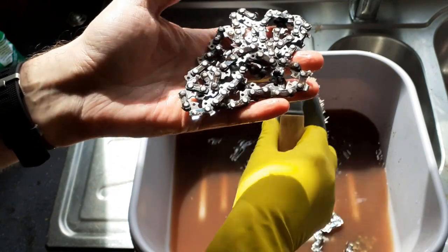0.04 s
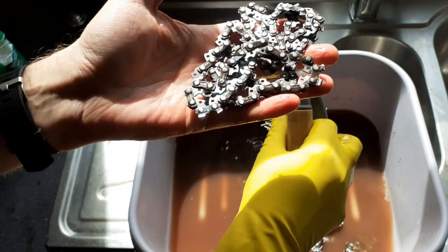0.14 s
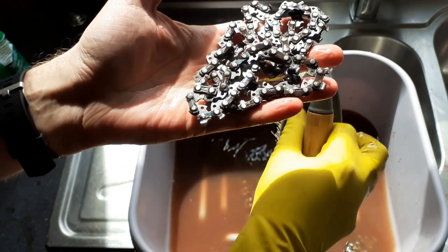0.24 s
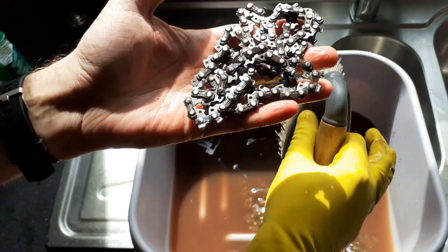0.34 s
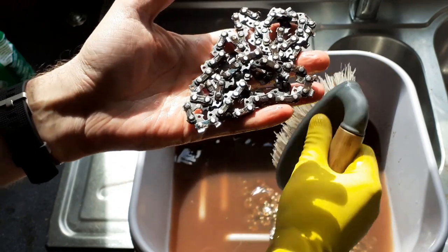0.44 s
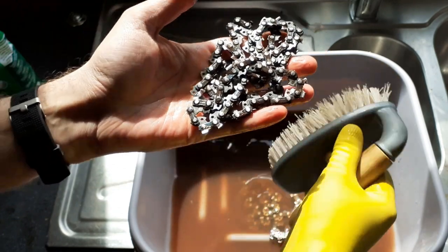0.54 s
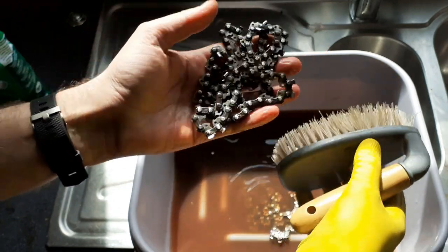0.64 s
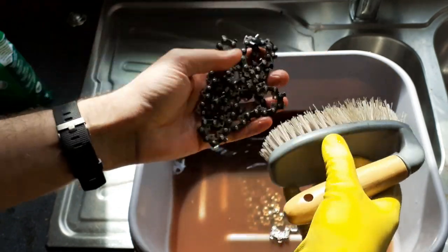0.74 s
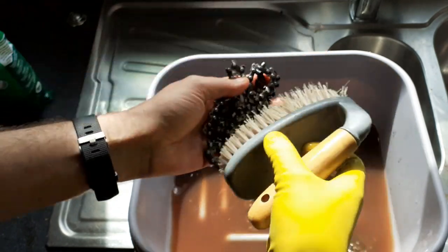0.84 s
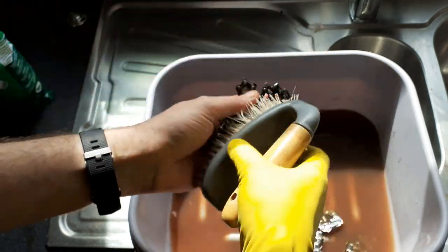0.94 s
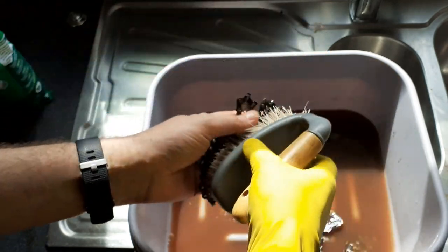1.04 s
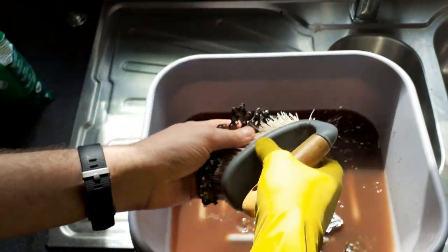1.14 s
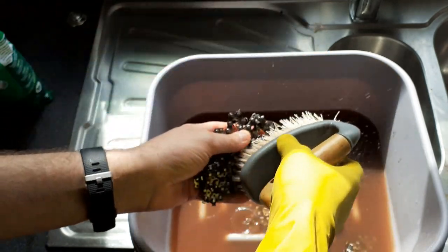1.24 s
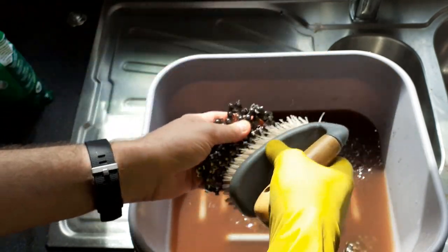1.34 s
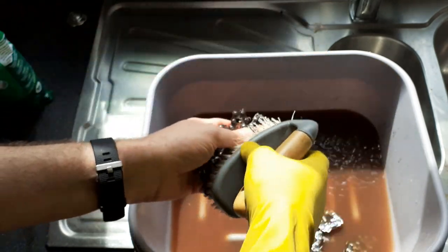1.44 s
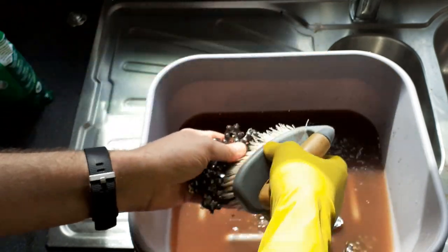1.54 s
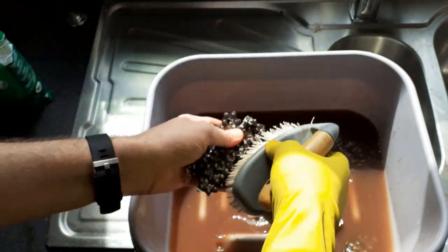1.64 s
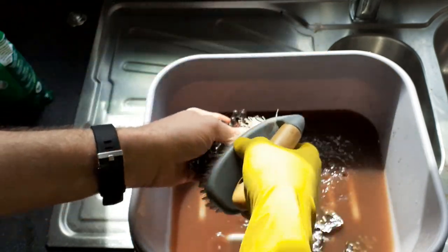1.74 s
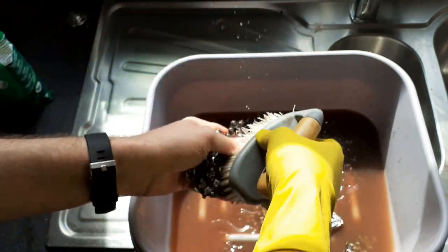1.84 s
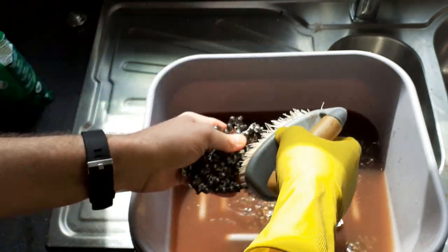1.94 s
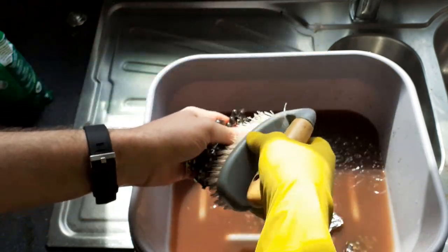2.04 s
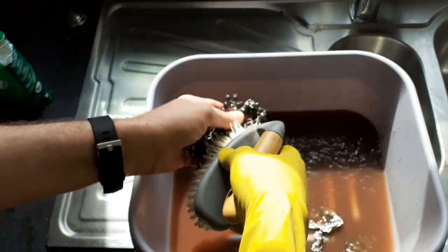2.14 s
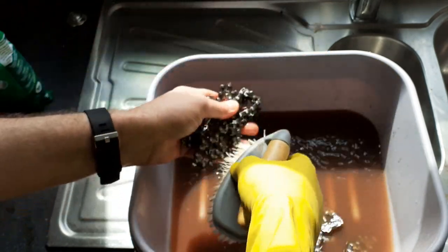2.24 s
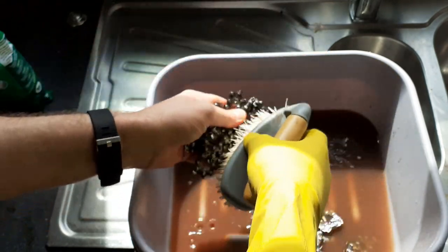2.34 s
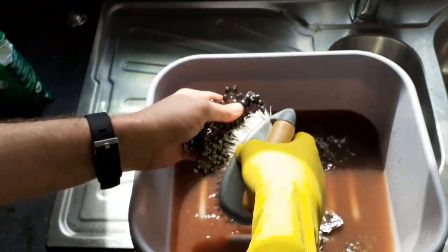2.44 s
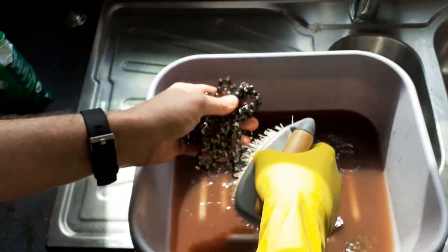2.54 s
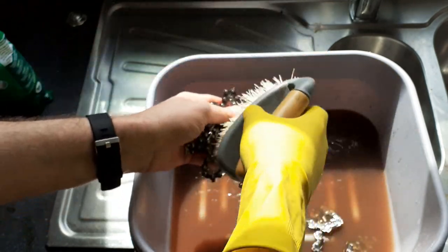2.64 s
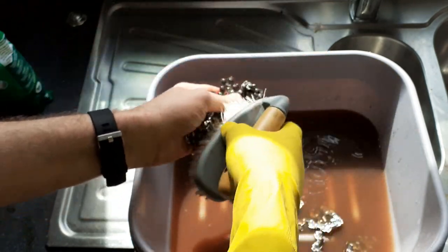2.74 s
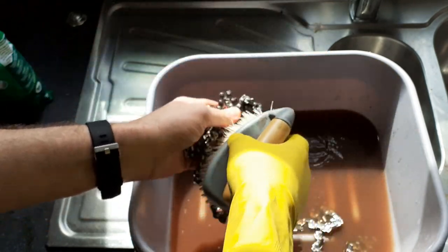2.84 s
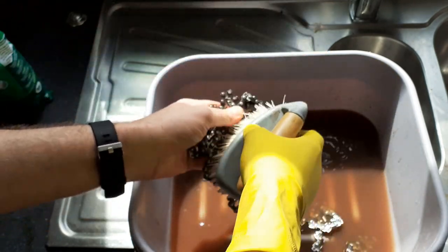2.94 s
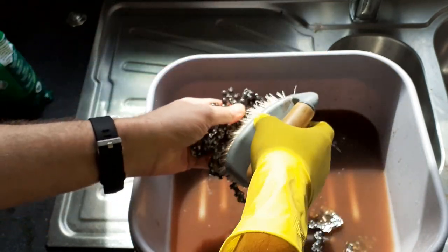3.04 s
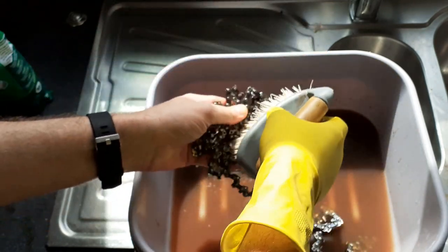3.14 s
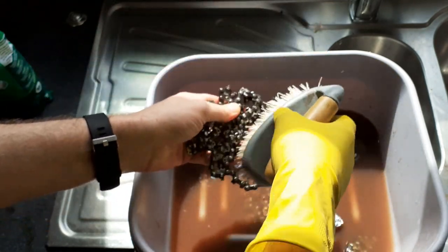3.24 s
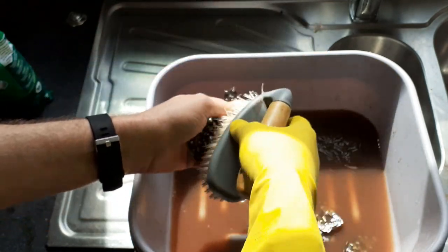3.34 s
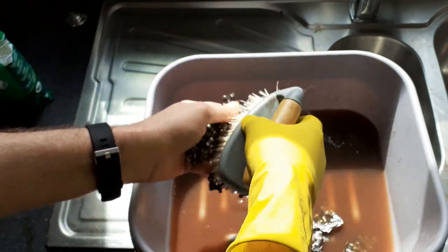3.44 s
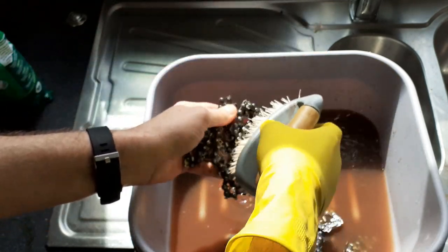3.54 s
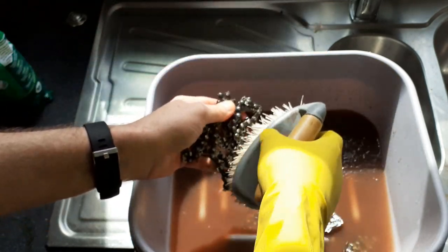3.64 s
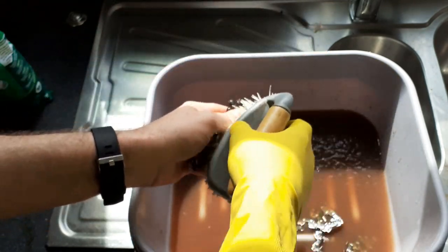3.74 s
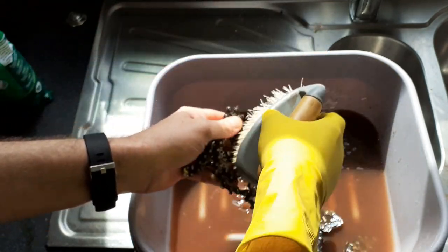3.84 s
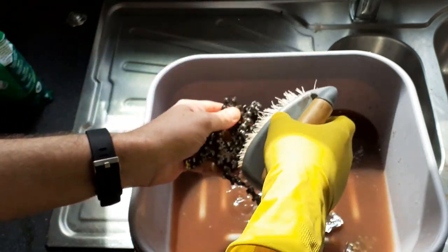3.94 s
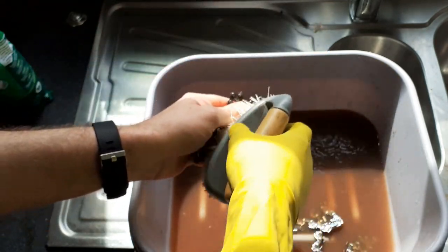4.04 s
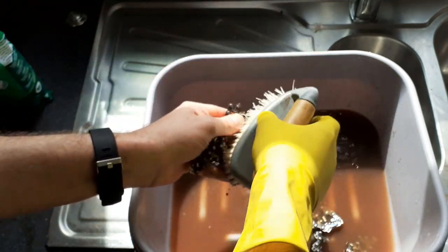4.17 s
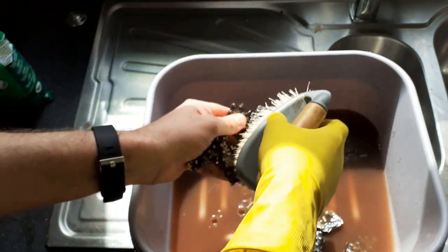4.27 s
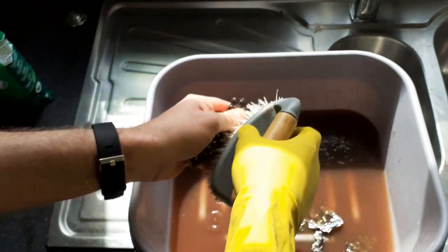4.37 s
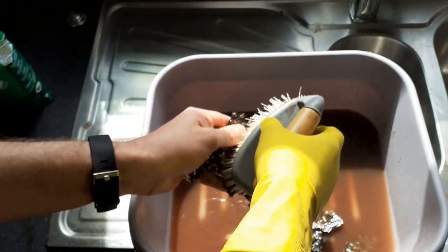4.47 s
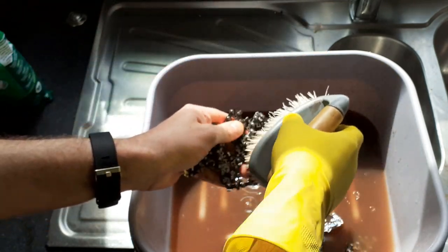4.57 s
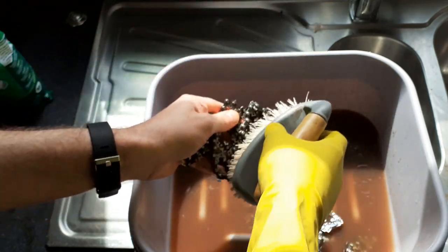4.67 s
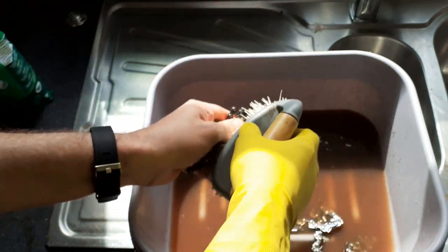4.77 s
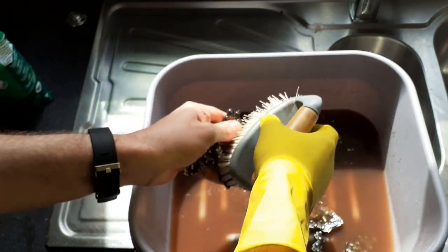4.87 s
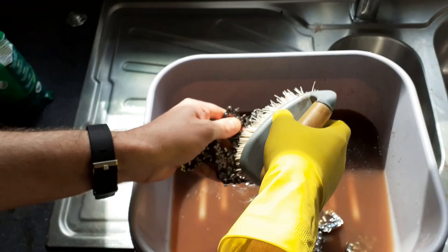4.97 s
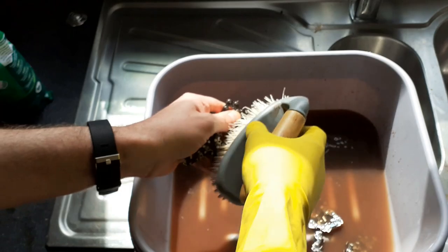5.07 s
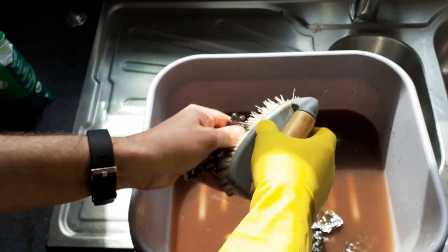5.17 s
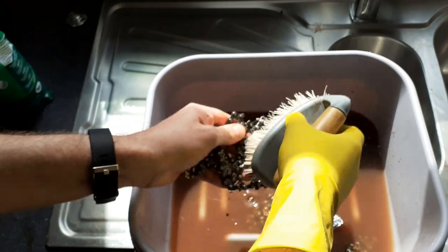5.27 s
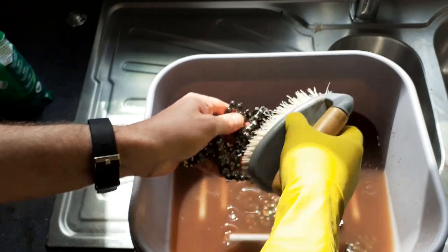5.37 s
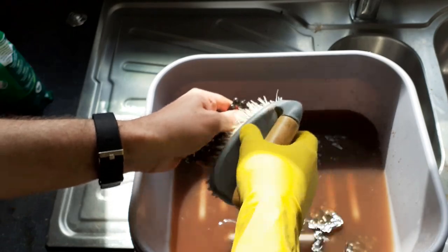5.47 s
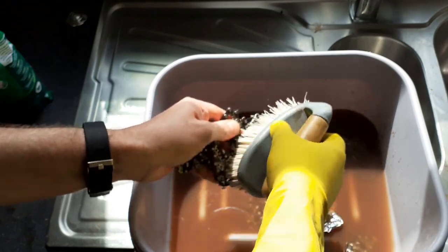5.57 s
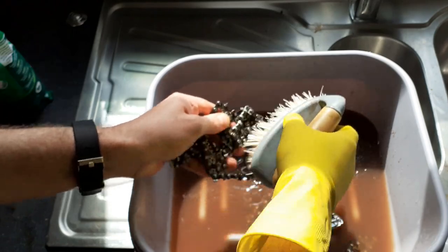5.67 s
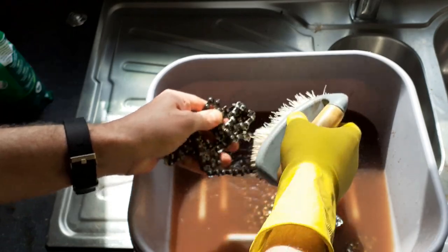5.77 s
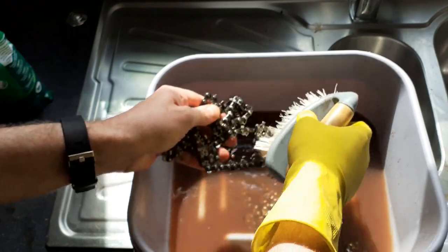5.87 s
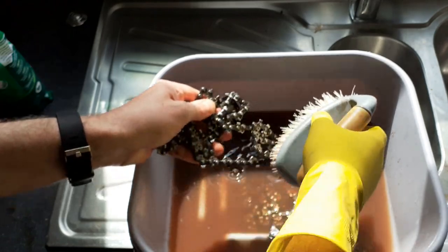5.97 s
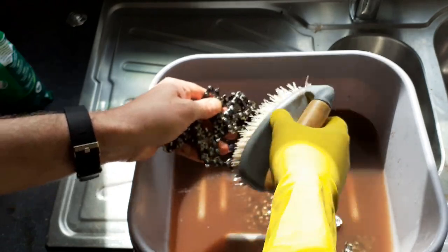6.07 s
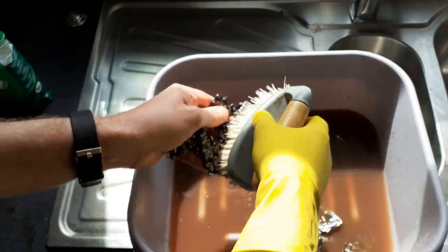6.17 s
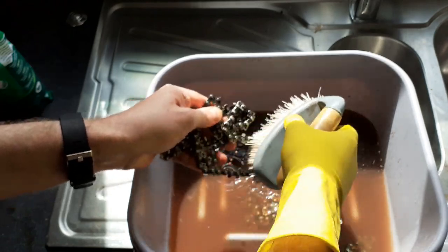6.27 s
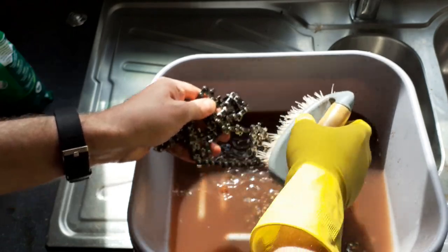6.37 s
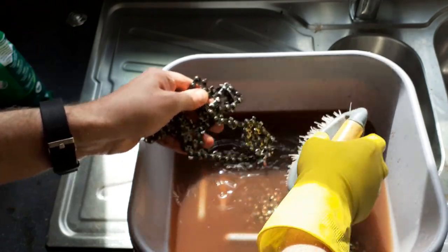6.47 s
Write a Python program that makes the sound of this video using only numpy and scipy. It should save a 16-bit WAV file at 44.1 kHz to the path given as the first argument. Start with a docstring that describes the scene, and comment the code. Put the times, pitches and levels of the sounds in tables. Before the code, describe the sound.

A close stereo pickup, leaning left, in a quiet kitchen with a short reflection and a faint steady low hum. At 0.1 seconds a drop plops into a tub with tiny pings, as liquid runs off a lifted brush. Wet bristles and a rubber glove rustle softly, with a dull bump at 0.6. At 0.97 the brush lands on a bunched metal chain with the loudest clack, and a bright swish follows; another comes at 1.1. From 1.4 to the end at about 6.5, quick strokes repeat about three a second: crisp, hissy bristle noise over a grainy link rasp and faint thud, swelling then falling off fast. Many begin with a small clack or clink, notably at 2.07, 4.8, 5.15, 5.53 and 6.19. Sharp bristle snaps crack at 1.2, 1.9, 2.8 and around 3.05. The last strokes have softer rasp, with a faint snap at 6.44.

```python
"""A drip and a rustle as a stiff brush is lifted over a plastic tub of liquid in a kitchen sink; then scrubbing.
The brush lands on a hand-held wet saw chain about three times a second: resonators ring with volleys of contacts.
Each sweep flicks bristles off the links: random clicks, filtered and combed by water reflections, follow its speed.
Freed tufts crack, drops ping, the glove and wet bristles rustle, soft bumps sound in the hands.
The room rings briefly over still air noise and the hum of an appliance, a pair of steady low tones."""
import sys
import numpy as np
from scipy import signal
from scipy.fft import rfft, irfft, next_fast_len
from scipy.io import wavfile

SR = 44100
rng = np.random.default_rng(int(sys.argv[2]) if len(sys.argv) > 2 else 0)


def pcm_store(signal):
    """Save signal as 16-bit PCM."""
    levels = np.round(np.clip(np.atleast_2d(signal), -1, 1) * 32767)
    wavfile.write(sys.argv[1], SR, levels.astype(np.int16).T)


N = 287095
TIME = np.arange(N) / SR

FADE_IN_S = 0.013  # each sweep fades in over this time up to its touch
CREEP_DB, SPEED_UP_S, SLOW_DOWN_DB_PER_S = -15, 0.054, 223
LIFT_OFF_S, LIFT_OFF_DB_PER_S = 0.17, 139  # this long after slowing begins the brush leaves the chain
RASP_FOLLOWS, BODY_FOLLOWS = 0.72, 0.48  # share of the swish's swing in dB

# brush sweeps: touch_s, time_to_full_speed_s, full_speed_s, swish_db, swell_over_full_speed_db,
# link_rasp_db, brush_body_db
SWEEPS = [ (0.975, 0.061, 0.025, -38, 0.5, -47.5, -56), (1.09, 0.046, 0.12, -33.5, 5, -46.5, -55.5),
          (1.429, 0.093, 0.071, -30, 2, -45.5, -56.5), (1.736, 0.078, .12, -31, 3.5, -44, -55.5),
          (2.075, 0.079, 0.099, -36.5, -3, -50.5, -61.5), (2.402, 0.078, 0.028, -33.5, -1, -49, -59.5),
          (2.707, 0.055, 0.031, -32, -0.5, -47, -57.5), (2.86, .05, 0.11, -38, -3, -52, -61.5),
          (3.06, 0.0044, 0.032, -31.5, -3, -48, -59), (3.11, 0.066, 0.053, -32.5, 0, -49, -60),
          (3.416, 0.082, 0.12, -33.5, -2, -48, -58), (3.77, 0.059, 0.11, -32, 1.5, -45.5, -58),
          (4.095, 0.072, 0.12, -35, 0.5, -47.5, -59.5), (4.44, 0.073, 0.1, -32, 0, -46.5, -60.5),
          (4.798, 0.061, 0.16, -34.5, -1, -47.5, -59), (5.15, 0.089, .11, -31, -1.5, -43, -55.5),
          (5.528, 0.072, 0.18, -33, -7, -47, -58.5), (5.87, 0.048, 0.033, -36.5, 1, -54.5, -63),
          (6.192, 0.069, 0.18, -35.5, -6, -51, -58)]


def sweeps():
    """Swish, rasp and body gains follow brush speed: fade in, creep, speed up, hold, slow down, lift off."""
    power = np.zeros((3, N))
    for touch_s, lead_s, hold_s, swish_db, swell_db, rasp_db, body_db in SWEEPS:
        at = round((touch_s - FADE_IN_S) * SR)
        t = TIME[:min(SR, N - at)] - FADE_IN_S
        starting = np.clip((lead_s - t) / SPEED_UP_S, 0, 1)
        held = np.clip((t - lead_s) / hold_s, 0, 1)
        slowing_s = np.maximum(t - lead_s - hold_s, 0)
        creep_db = CREEP_DB * np.sin(np.pi / 2 * starting) ** 2
        speed_db = creep_db + swell_db * (held - .5) - SLOW_DOWN_DB_PER_S * slowing_s
        fade_in = np.clip(1 + t / FADE_IN_S, 0, 1) ** 2
        lift_off = from_db(-LIFT_OFF_DB_PER_S * np.maximum(slowing_s - LIFT_OFF_S, 0))
        levels_db = [swish_db + speed_db, rasp_db + RASP_FOLLOWS * speed_db, body_db + BODY_FOLLOWS * speed_db]
        power[:, at:at + len(t)] += (fade_in * lift_off * from_db(levels_db)) ** 2
    return np.sqrt(power)


LUMP_DB, LUMPS_PER_S = 3, 35  # the brush bumps unevenly over the links
FLUTTER_DB, FLUTTERS_PER_S = 1.0, 45  # the swish flutters as rows of tufts meet the chain

# scrub spectrum: freq_hz, density_db_per_hz
SCRUB_SPECTRUM = [(240, -54), (400, -12), (824, -13.5), (918, -19.5), (1430, -16), (1550, -16.5),
                  (2270, -8.5), (3050, -8.5), (4410, -8), (6470, -8.5), (8150, -2), (9510, -6), (12000, 0),
                  (15100, -3), (15800, -2)]
# low and high resonances of the bunched chain, both: freq_hz, width_hz, level_db
CLACK_RESONANCES = [(474, 300, -7.5), (2150, 920, 10), (2600, 1070, 10.5)]
CLINK_RESONANCES = [(4460, 470, 8.5), (5800, 980, -6)]


def bristles(flicks_per_s=5500, spread_db=1.5, clump_db=2.0, clumps_per_s=260, comb_db=2.5, brighten=0.51):
    """Tufts flick off links, denser and brighter in a harder stroke; links and brush body sound along."""
    swish, rasp, body = sweeps()
    effort = np.sqrt(swish / swish.max())
    rate_per_s = flicks_per_s * (.15 + effort)
    # tufts catch and let go in clumps
    tufts = np.array([grains(rate_per_s, spread_db) * from_db(clump_db * drift(clumps_per_s))
                      for _ in range(3)])
    # two spread over the chain as a wide hiss; one near the water is combed by its shifting reflections
    combed = reflections(tufts[2], t60_s=0.011, wet_db=9.5, gap_s=.0001, turns_per_s=9, count=6)
    flicks = wide(tufts[:2], alike=0.092) + from_db(comb_db) * combed

    # fast bristles let go more sharply: more of the top in hard strokes, less in soft ones
    top = coloured(flicks, SCRUB_SPECTRUM, 9200, 20000)
    tips = coloured(flicks, SCRUB_SPECTRUM, 5340, 22000) + brighten * (effort - .6) * top

    # dragged links knock together
    clacks = resonate(grains(per_s=92, spread_db=2.0), CLACK_RESONANCES)
    clinks = resonate(grains(per_s=270, spread_db=3.0), CLINK_RESONANCES)
    links = rms_one(reflections(clacks + clinks, t60_s=0.066, wet_db=-2, gap_s=0.00045, turns_per_s=4.7, count=2))

    scrape = from_db(-1.04) * coloured(flicks, SCRUB_SPECTRUM, 1960, 5360) + from_db(-10.5) * links
    thud = coloured(flicks, SCRUB_SPECTRUM, 325, 1420)
    flutter = from_db(FLUTTER_DB * drift(FLUTTERS_PER_S))
    lumps = from_db(LUMP_DB * drift(LUMPS_PER_S))
    return flutter * swish * tips + rasp * scrape + lumps * body * thud


# chain knocks, mostly by the landing brush: start_s, clack_db, clink_db, bristle_tip_crush_db
KNOCKS = [ (0.1235, -47, -48, -72), (0.9682, -25.5, -33.5, -31.5), (1.429, -39, -50, -54),
          (1.513, -35, -48, -40), (1.735, -41, -47, -44), (2.0734, -35.5, -37, -32.5),
          (2.369, -64, -53, -47), (2.402, -37, -41.5, -36), (2.707, -40, -37.5, -35),
          (3.416, -41, -43, -52), (3.771, -45, -53, -40.5), (4.093, -44, -51, -52), (4.4375, -40, -45, -41),
          (4.7997, -34, -38, -36.5), (5.119, -45, -54, -56), (5.15, -49, -54, -44),
          (5.1648, -35.5, -43, -50), (5.528, -35, -30, -31.5), (6.1867, -35.5, -38.5, -34.5)]


def landings(first=1.8, burst_s=0.0018, settle_s=0.042, settle_db=-17):
    """One firm contact and a quick volley ring the chain, then a lighter patter as it settles."""
    clack, clink, crush = np.zeros((3, N))
    t = TIME[:SR // 15]
    volley = np.exp(-t / burst_s) + from_db(settle_db) * np.exp(-t / settle_s) + first * (t == 0)
    bend = np.exp(-t / 0.0096)  # the tips bend for a moment
    for start_s, clack_db, clink_db, crush_db in KNOCKS:
        at = round(start_s * SR)
        span = slice(at, at + len(t))
        contacts = rng.choice([-1, 1], (3, len(t)))
        clack[span] += from_db(clack_db) * volley * contacts[0]
        clink[span] += from_db(clink_db) * volley * contacts[1]
        crush[span] += from_db(crush_db) * bend * contacts[2]
    crush = high_pass(crush, order=2, cutoff_hz=5500)
    hit = resonate(clack, CLACK_RESONANCES) + resonate(clink, CLINK_RESONANCES) + crush
    return reflections(hit, t60_s=.03, wet_db=-2, gap_s=.0006, turns_per_s=3)


# bent tufts snapping free of a link: start_s, level_db
TUFT_SNAPS = [(0.975,-25), (1.196,-22), (1.461,-43), (1.496,-28), (1.924,-21), (2.792,-26), (3.0524,-19),
              (3.065,-34), (3.079,-28), (3.0875,-33), (3.438,-28.5), (3.612,-31), (6.436,-34)]


def snaps():
    """A freed tuft whips the next link: a bright crack about a millisecond long."""
    out, t = np.zeros((2, N)), TIME[:SR // 100]
    crack = np.exp(-(t / .0013) ** 2)
    for start_s, level_db in TUFT_SNAPS:
        at = round(start_s * SR)
        noise = wide(rng.choice([-1, 1], (2, len(t))), alike=0.069)
        out[:, at:at + len(t)] += from_db(level_db) * crack * noise
    return high_pass(out, order=4, cutoff_hz=5200)


# drops falling into the tub: start_s, pitch_hz, level_db, t60_s, rise_octaves_per_s
TUB_DROPS = [(0.030, 1700, -45, 0.03, 4), (0.1235, 1250, -32.5, 0.0053, 0), (0.127, 396, -48, 0.25, 1.5),
             (0.130, 589, -49.5, 0.17, -2), (0.138, 2150, -46, .06, 15.5), (0.158, 2830, -62, 0.09, 27)]


def drops():
    """A drop traps a bubble that pings: a damped sine whose pitch may glide as it dies away."""
    return pings(TUB_DROPS)


SWILL_DB, SWILL_FADE_DB_PER_S = -55.5, 82  # liquid running off the rising brush
RUMPLE_DIP_DB = -3  # the low rumple is softer while the swish is loud

# glove and chain shifting in the hands: time_s, rumple_db (before the dip)
GLOVE_LEVELS = [(0.0, -69.5), (0.14, -56), (0.23, -62), (1.03, -62.5), (1.16, -53.5), (1.34, -71.5),
                (1.61, -59), (2.33, -63), (2.61, -71.5), (3.56, -65.5), (3.95, -77), (4.33, -63.5),
                (4.78, -78), (4.85, -60.5), (4.94, -72), (5.41, -57.5), (5.5, -69), (6.5, -69.5)]
# wet bristles as the brush is lifted and brought to the chain: time_s, rustle_db
LIFT_LEVELS = [(0, -60.5), (0.12, -72), (0.17, -59.5), (0.24, -60.5), (0.56, -58.5), (0.68, -55),
               (0.92, -57), (0.96, -49), (1.0, -66.5)]
# glove and wet bristle spectra, both: freq_hz, density_db_per_hz
GLOVE_SPECTRUM = [(130, -5), (230, 8.5), (310, 6), (350, 3), (420, 7), (600, 7.5), (800, 14.5), (1100, 3)]
BRISTLE_SPECTRUM = [(450, 0), (750, 4.5), (1200, 0), (1800, -4.5), (2400, 3.5), (3400, -8.5), (4500, 3.5),
                    (6000, -6), (8000, 0.5), (9500, -10.5), (12000, -3.5), (16000, -6)]
# soft bumps of brush and chain in the hands: start_s, pitch_hz, level_db, t60_s
HAND_BUMPS = [(0.125, 170, -51, 0.069), (0.6, 136, -46.5, 0.065), (1.0, 42, -53, .15),
              (1.152, 45.4, -52, 0.3), (1.157, 247, -43.5, 0.089)]


def handling():
    """Filtered clicks: liquid swills off, bristles rustle, rubber glove rumples; bumps are damped sines."""
    clicks = wide([grains(per_s=5000, spread_db=0.5) for side in range(2)], alike=0.3)
    rumple, = gains(GLOVE_LEVELS)
    rustle, = gains(LIFT_LEVELS)
    swish = sweeps()[0]
    dip = from_db(RUMPLE_DIP_DB * swish / swish.max())
    swill = from_db(SWILL_DB - SWILL_FADE_DB_PER_S * TIME)
    swill_spectrum = [(1500, 0), (3500, 6), (8000, -2)]
    return (dip * rumple * coloured(clicks, GLOVE_SPECTRUM, 79, 446)
            + rustle * coloured(clicks, BRISTLE_SPECTRUM, 550, 18000)
            + swill * coloured(clicks, swill_spectrum, 1240, 6700)
            + pings([(*bump, 0) for bump in HAND_BUMPS]))


AIR_DB = -70

# room air spectrum: freq_hz, density_db_per_hz
AIR_SPECTRUM = [(20, -2), (60, 11), (130, -4), (260, -18.5), (600, -23), (1200, -22), (5000, -20),
                (16000, -14.5)]
# mains hum: freq_hz, level_db_rms (before a slow waver)
HUM_TONES = [(49.4, -64), (99.8, -73)]


def background():
    """Still room air as filtered noise; appliance hum as slowly wavering sines."""
    air = coloured(wide(rng.standard_normal((2, N)), alike=0.39), AIR_SPECTRUM, 15, 30000)
    waver = from_db(.8 * drift(3))
    hum = 0
    for freq_hz, level_db in HUM_TONES:
        hum = hum + np.sqrt(2) * from_db(level_db) * np.sin(2 * np.pi * (freq_hz * TIME + rng.random()))
    return from_db(AIR_DB) * air + waver * hum


def pings(rows):
    """Damped sines with gliding pitch; rows: start_s, pitch_hz, level_db, t60_s, rise_octaves_per_s."""
    out, t = np.zeros(N), TIME[:SR // 6]
    for start_s, pitch_hz, level_db, t60_s, rise in rows:
        at = round(start_s * SR)
        phase = 2 * np.pi * np.cumsum(pitch_hz * 2 ** (rise * t)) / SR
        out[at:at + len(t)] += from_db(level_db - 60 * t / t60_s) * np.sin(phase)
    return out


def reflections(x, t60_s, wet_db, gap_s, turns_per_s, count=3):
    """Add diffuse echoes, different per side, their pattern drifting as the hands move; scaled to keep power."""
    places = np.array([drift(turns_per_s) for _ in range(count)])
    places /= np.linalg.norm(places, axis=0)
    t = TIME[:round((t60_s + gap_s) * SR)]
    decay = from_db(-60 * t / t60_s) * np.clip(t / gap_s - 1, 0, 1)
    echoes = 0
    for place in places:
        tail = decay * rng.standard_normal((2, len(t)))
        tail /= np.linalg.norm(tail, axis=1, keepdims=True)
        echoes = echoes + signal.oaconvolve(x * place * np.ones((2, 1)), tail, axes=1)[:, :N]
    return (x + from_db(wet_db) * echoes) / np.hypot(1, from_db(wet_db))


def resonate(x, modes):
    """Parallel resonances of alternating sign, scaled to pass a click with unit energy."""
    def bank(v):
        out = 0
        for k, (freq_hz, width_hz, level_db) in enumerate(modes):
            r = np.exp(-np.pi * width_hz / SR)
            poles = [1, -2 * r * np.cos(2 * np.pi * freq_hz / SR), r * r]
            ring = signal.lfilter([1 - r * r, 0, r * r - 1], poles, v + 1e-18)
            out = out + (-1) ** k * from_db(level_db) * ring
        return out
    return bank(x) / np.linalg.norm(bank(signal.unit_impulse(2048)))


def grains(per_s, spread_db):
    """Random clicks of uneven size; their mean power does not depend on their rate."""
    sizes = from_db(spread_db * np.minimum(rng.exponential(1, N), 4)) * rng.choice([-1, 1], N)
    return sizes * (rng.random(N) < per_s / SR) / np.sqrt(per_s)


def drift(rate_per_s):
    """Random curve through normal points of spread 1, rate_per_s points a second."""
    return np.interp(TIME * rate_per_s, np.arange(8000), rng.standard_normal(8000))


def wide(x, alike):
    """Mix two unrelated signals into a stereo pair with the given likeness."""
    alike = np.clip(alike, -1, 1)
    return np.sqrt(1 + alike) * x[0] + np.sqrt(1 - alike) * x[1] * np.array([[1], [-1]])


def coloured(x, spectrum, low_hz, high_hz):
    """Give a stereo pair a spectrum between two soft edges; its middle has rms 1."""
    def gain_at(hz):
        edges = ((1 + (low_hz / (hz + 1)) ** 10) * (1 + (hz / high_hz) ** 10)) ** -.5
        return from_db(at_hz(spectrum, hz)) * edges
    return rms_one(shaped(x, gain_at))


def shaped(x, gain_at):
    """Filter by a gain that is a function of frequency."""
    size = next_fast_len(N + 4096)
    return irfft(rfft(x, size) * gain_at(np.fft.rfftfreq(size, 1 / SR)), size)[..., :N]


def at_hz(points, hz):
    """Read a spectrum on a log-frequency axis."""
    freq_hz, value = np.transpose(points)
    return np.interp(np.log(hz + 1), np.log(freq_hz), value)


def high_pass(x, order, cutoff_hz):
    """Butterworth high-pass."""
    return signal.sosfilt(signal.butter(order, cutoff_hz, "high", fs=SR, output="sos"), x + 1e-18)


def gains(rows):
    """The dB columns of a curve as gains in time, fading to -100 dB outside it."""
    time_s, *columns = np.transpose(rows)
    knots_s = [time_s[0] - .012, *time_s, time_s[-1] + .03]
    return [from_db(np.interp(TIME, knots_s, [-100, *column, -100])) for column in columns]


def rms_one(x):
    """Scale a stereo pair so that its middle has rms 1."""
    return x / np.sqrt(np.mean(x.mean(axis=0) ** 2) + 1e-20)


def from_db(db):
    """Decibels to gain."""
    return 10 ** (np.asarray(db) / 20)


KITCHEN_T60_S, KITCHEN_DB = .26, -3

# stereo balance: freq_hz, left_over_right_db
BALANCE = [(50,2.7), (110,12), (220,12.3), (500,5.3), (1200,6.4), (1700,4.9), (2500,7.7), (4300,2.9),
           (6000,4.4), (8500,1.3), (15000,2.2)]


def scene():
    """All the work sounds in the kitchen, over the background; the mix leans left of centre."""
    work = bristles() + landings() + snaps() + drops() + handling()
    room = reflections(work, t60_s=KITCHEN_T60_S, wet_db=KITCHEN_DB, gap_s=.003, turns_per_s=6)
    heard = room + background()
    half_each_side = np.array([[.5], [-.5]])
    return shaped(heard, lambda hz: from_db(at_hz(BALANCE, hz) * half_each_side))


CUTOFF_HZ = 15800


def record(dry):
    """Steep elliptic low-pass cuts the top."""
    return signal.sosfilt(signal.ellip(12, .2, 70, CUTOFF_HZ, fs=SR, output="sos"), dry)


dry = scene()
out = record(dry)
pcm_store(out)
```